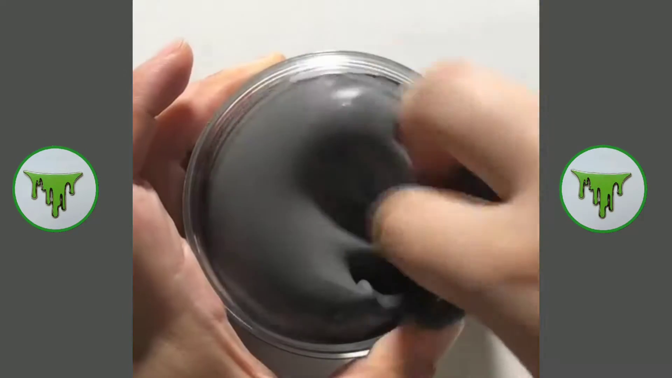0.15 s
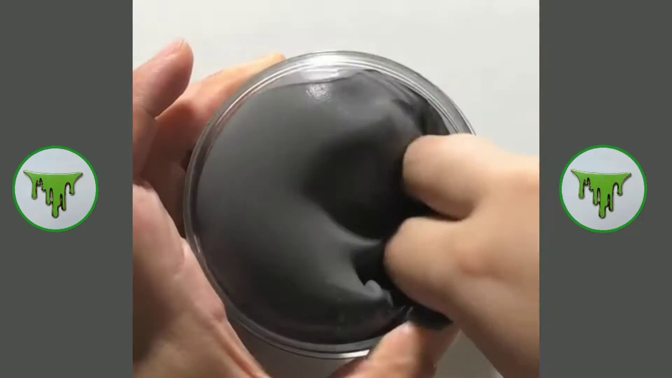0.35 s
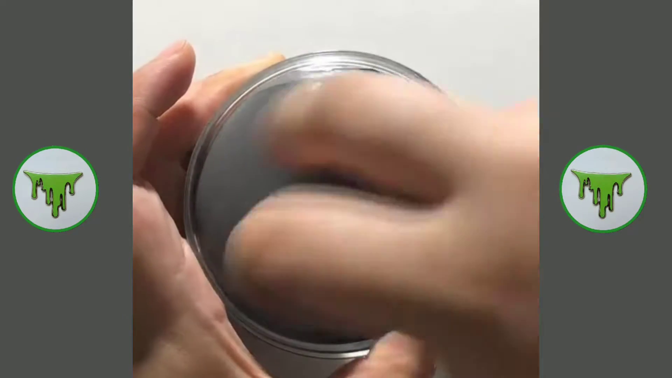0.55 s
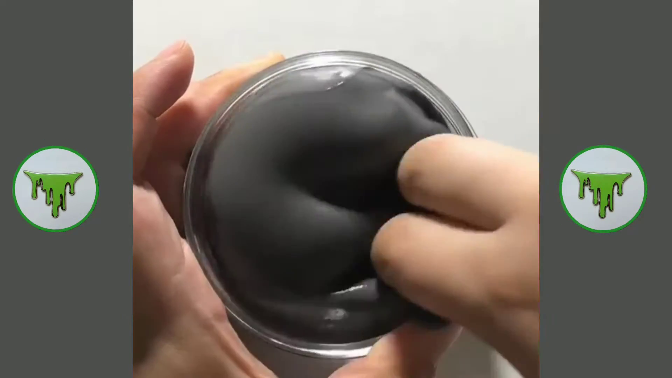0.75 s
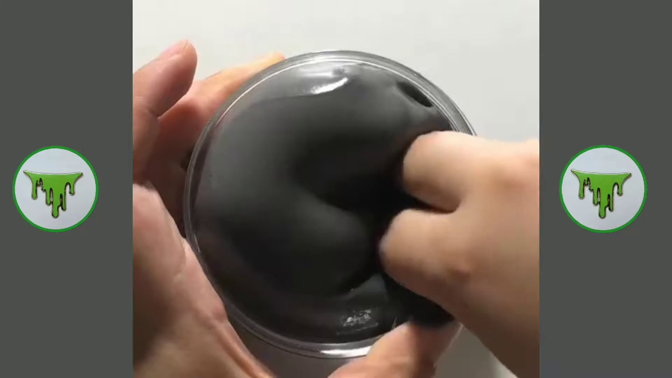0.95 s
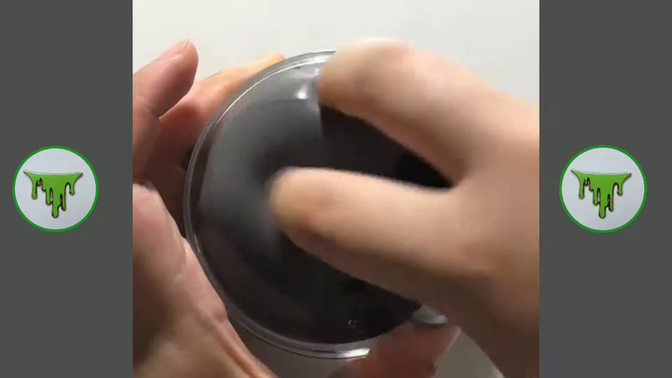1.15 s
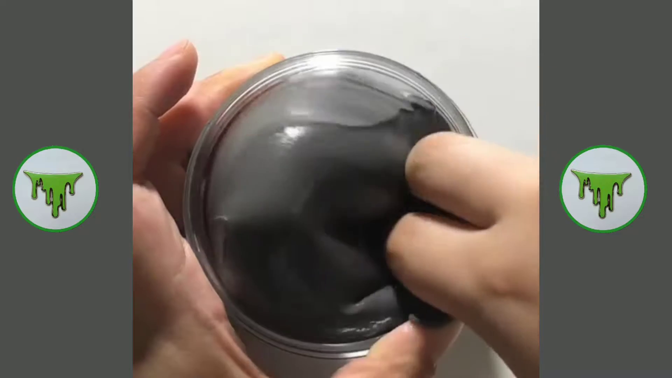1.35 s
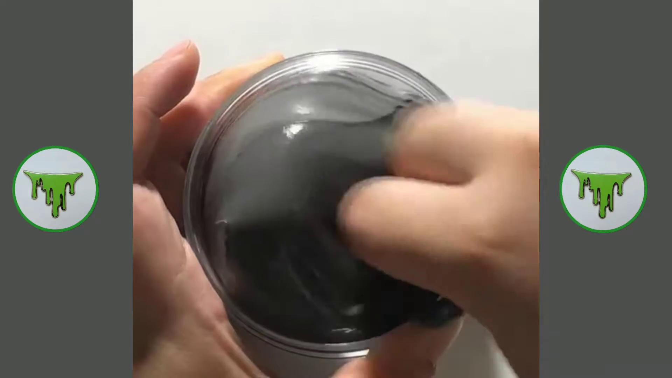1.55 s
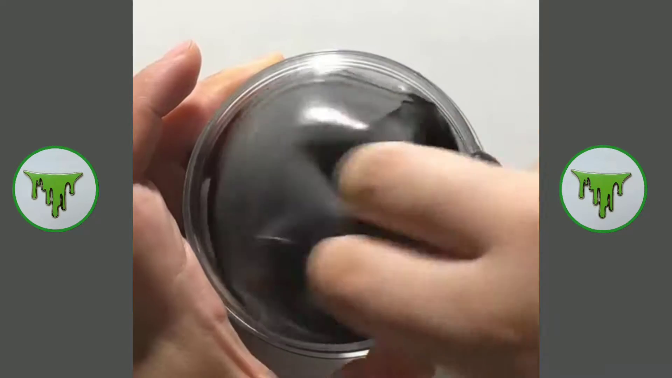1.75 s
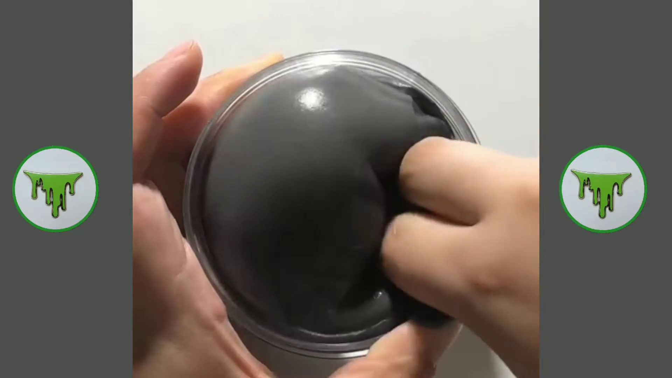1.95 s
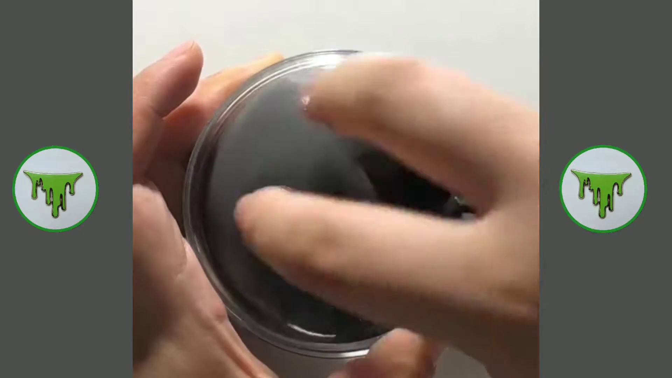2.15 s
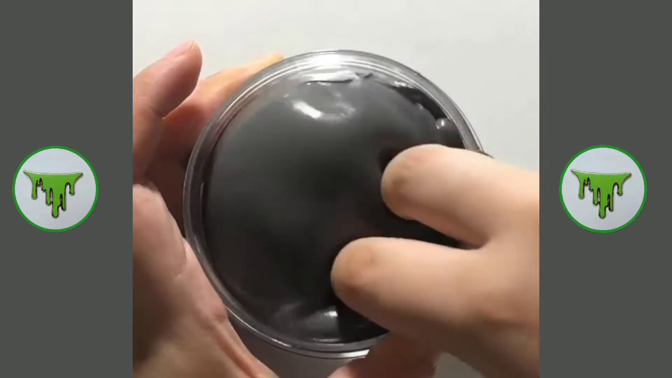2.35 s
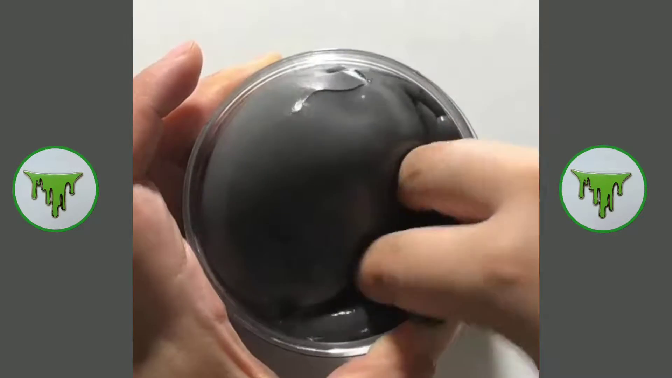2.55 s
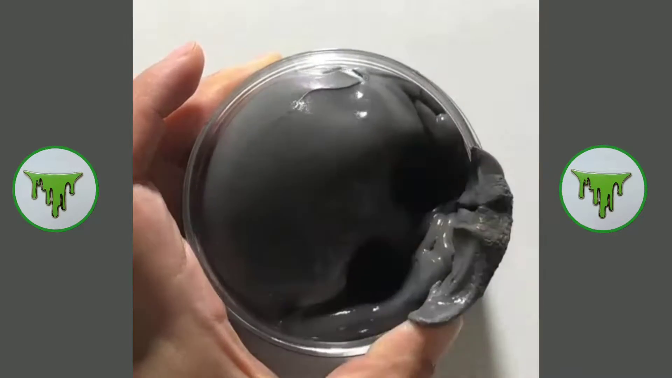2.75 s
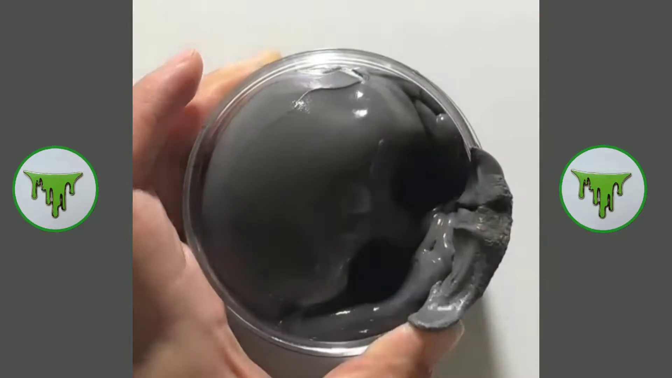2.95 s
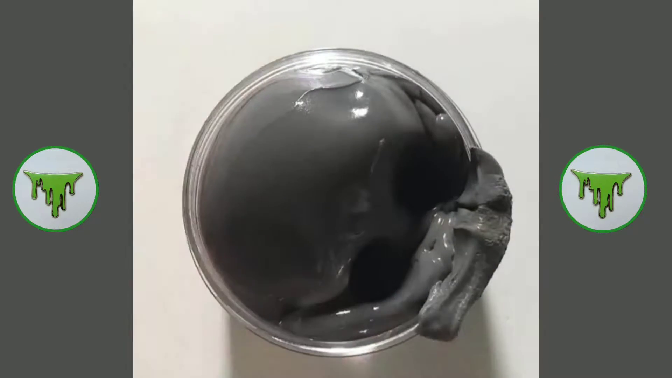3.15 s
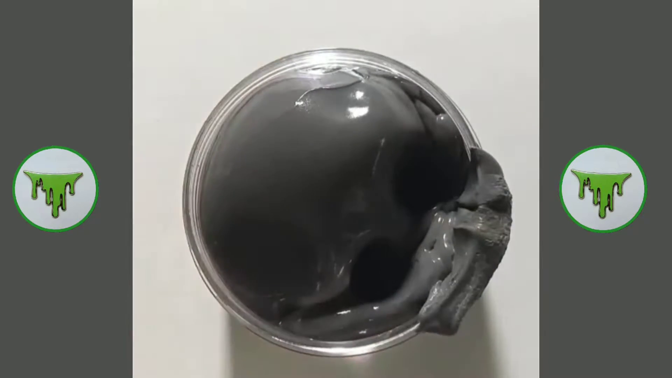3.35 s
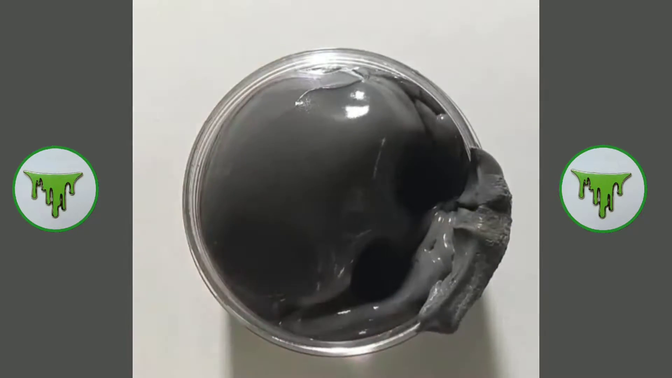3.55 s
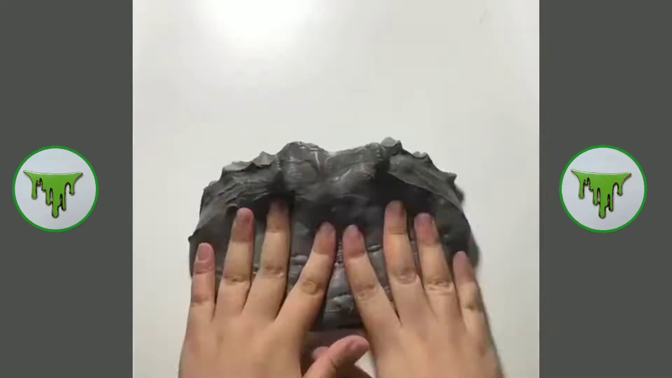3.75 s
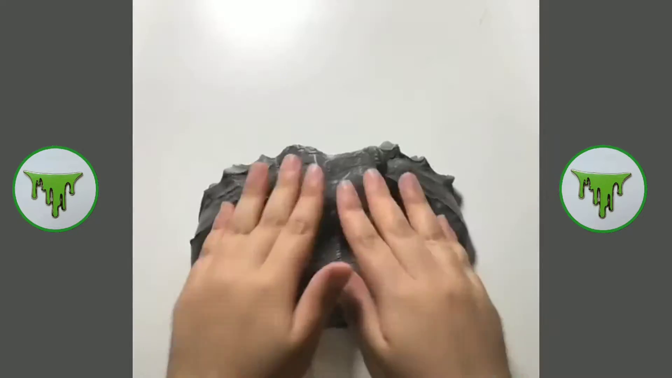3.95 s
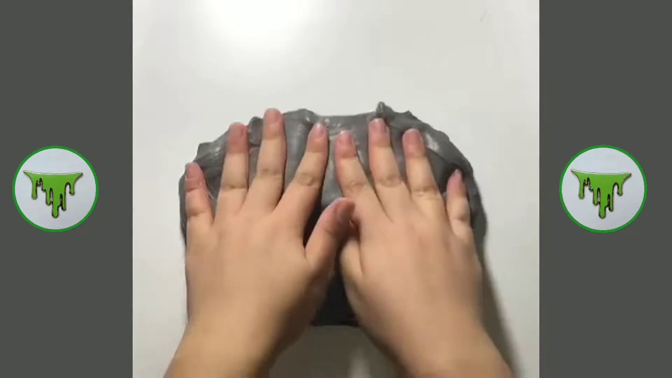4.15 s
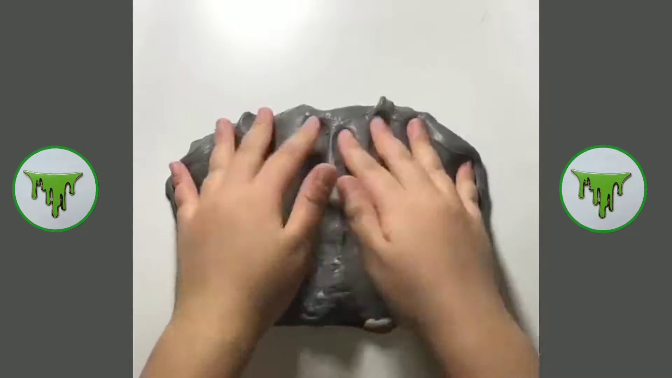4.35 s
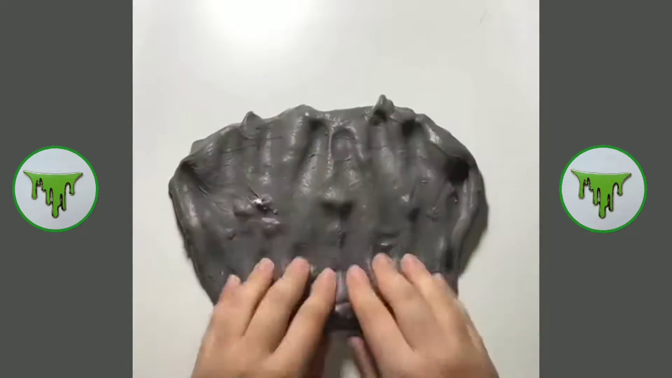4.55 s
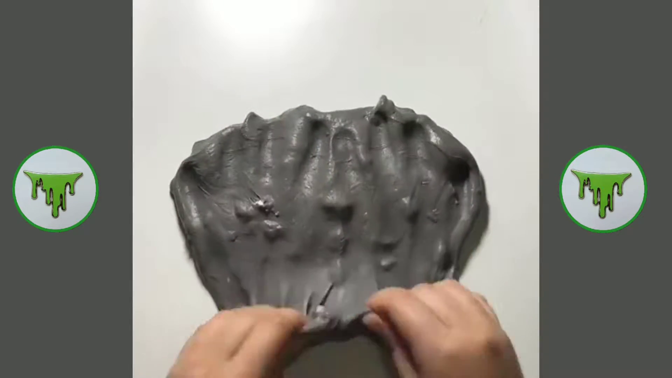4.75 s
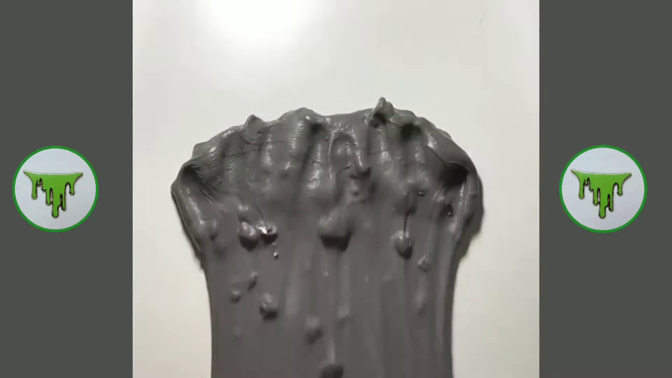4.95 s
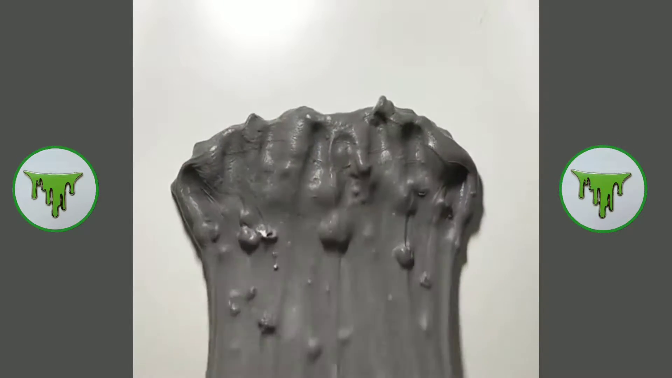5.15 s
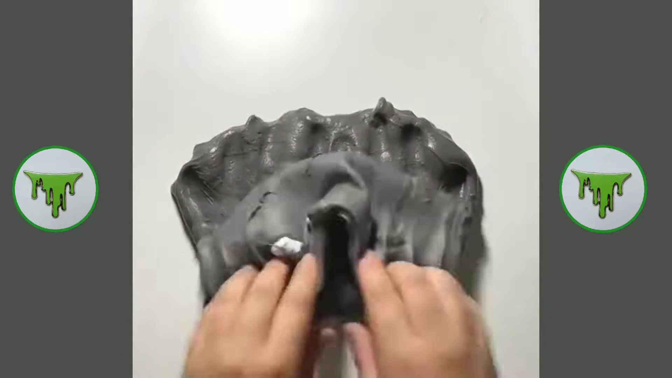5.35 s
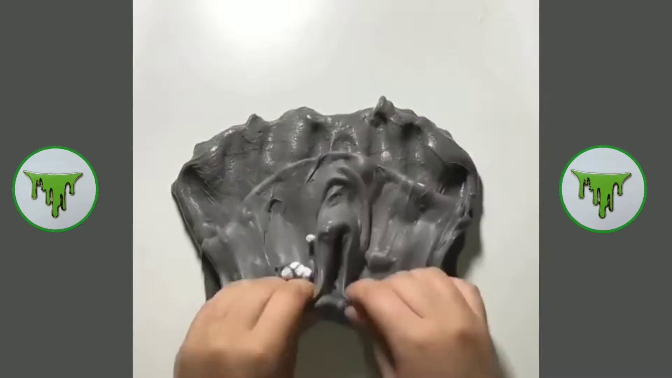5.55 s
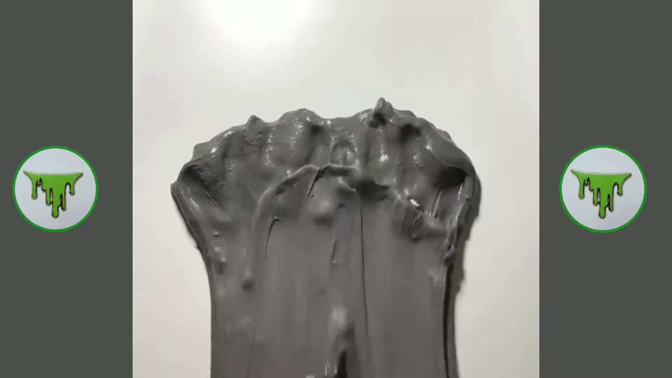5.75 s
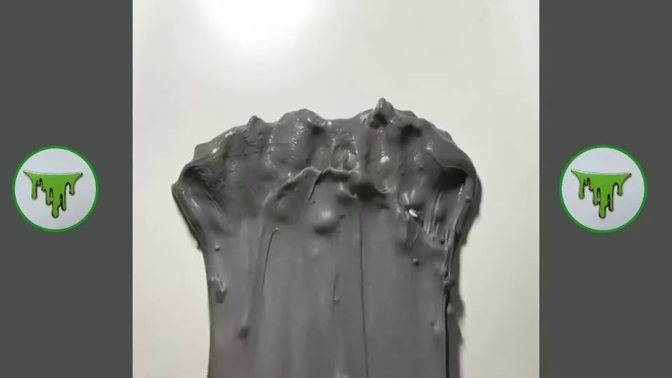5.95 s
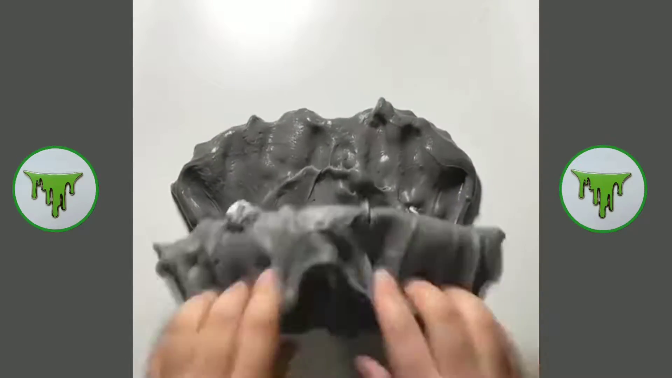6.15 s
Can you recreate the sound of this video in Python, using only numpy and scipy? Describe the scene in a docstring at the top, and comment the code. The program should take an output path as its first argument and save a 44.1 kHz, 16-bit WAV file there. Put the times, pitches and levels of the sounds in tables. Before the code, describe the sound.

Close, crisp slime sounds: snapping air bubbles and sticky crackles from a tub, a pause, then quieter squelchy pressing, peeling and folding on a table.

```python
"""A small, dry room: two fingers poke glossy slime in a plastic tub, then hands press, stretch and fold it on a table.
Trapped air bursts as damped rings with a soft modal thud; small bubbles tick as rings of a cycle or two.
Air spurts through narrow gaps and the sticky skin crackles as it peels: band-filtered swarms of tiny ruptures.
Landings add wet slaps; filtered noise makes the quiet ventilation hum and hiss underneath."""
import sys
import numpy as np
from scipy import signal
from scipy.fft import rfft, irfft, next_fast_len
from scipy.io import wavfile

SR = 44100
rng = np.random.default_rng(int(sys.argv[2]) if len(sys.argv) > 2 else 0)


def pcm_store(signal):
    """Save signal as 16-bit PCM."""
    levels = np.round(np.clip(np.atleast_2d(signal), -1, 1) * 32767)
    wavfile.write(sys.argv[1], SR, levels.astype(np.int16).T)


N = 277830
T = np.arange(N) / SR

# Air pockets bursting. Each row: time in seconds, pocket pitch in Hz, pocket level in dB,
# skin pitch in Hz, skin level in dB, snap level in dB, thud level in dB.
AIR_BURSTS = [(0.0972, 2570, -20, 4300, -25.5, -28.5, -42.5), (0.4633, 1840, -15, 4600, -17, -33, -39),
              (0.6253, 1540, -31, 2600, -35, -17.5, -43), (0.6498, 1690, -25.5, 4200, -12, -14.5, -44),
              (1.1725, 1590, -25, 3900, -19.5, -31, -36), (1.693, 1870, -30, 5800, -11.5, -20.5, -40),
              (2.2219, 1700, -61, 4400, -18, -15, -42.5), (2.4498, 2320, -36, 4500, -27, -35.5, -45),
              (2.5722, 2080, -34, 4500, -32, -37, -49.5), (2.7611, 2394, -27.5, 5600, -15.5, -8.5, -47.5),
              (2.7640, 1930, -21, 5000, -7, -7, -36.5), (5.544, 1260, -23, 3300, -24, -30, -40)]
# Tub, hands and slime landing softly. Each row: time in seconds, thud level in dB, wet slap level in dB.
LANDINGS = [(3.192, -44, -52), (4.182, -52, -53), (4.315, -47, -49), (4.754, -44.5, -69), (4.946, -48, -45),
            (5.386, -44.5, -49), (5.535, -52, -36.5), (5.555, -38, -38), (6.203, -45.5, -43)]
# Hands pressing, stretching and folding the sheet, which clings to the table in between.
# Each row: start in seconds, attack in seconds, hold in seconds, level in dB, brightness in dB per octave.
HAND_STROKES = [(3.919, 0.08, 0.036, -52.5, 3), (4.175, 0.012, 0.085, -62, 1),
                (4.317, 0.025, 0.097, -68, -1.5), (4.457, 0.053, 0.04, -52.5, 3.3),
                (4.672, 0.011, 0.5, -61.5, 2), (4.877, 0.017, 0.12, -50, 0), (5.202, 0.015, 1.042, -67, 1),
                (5.531, 0.028, .11, -61.5, -1.5), (5.657, 0.035, 0.12, -51, -1),
                (5.818, 0.016, 0.076, -59.5, -0.5)]


def pops(snap_hz=9200, strain_db=-35, strain_t60_s=0.06, splatter_db=-30, splatter_t60_s=0.069):
    """The skin fizzes as it thins, then tears: its air rings low, the skin high, the tear snaps, wet shreds settle."""
    out = np.zeros(N)
    t = T[:SR // 4]
    lead_s = 0.04
    for s, pocket_hz, pocket_db, skin_hz, skin_db, snap_db, _ in AIR_BURSTS:
        pocket = undb(pocket_db) * ring(pocket_hz, cycles=0.4)
        skin = undb(skin_db) * ring(skin_hz, cycles=0.93)
        snap = undb(snap_db) * ring(snap_hz, cycles=0.79)
        add(out, s, hollow(pocket - skin + snap))
        force = np.sqrt(np.sum(undb([pocket_db, skin_db, snap_db]) ** 2))
        strain = band(ruptures(len(t), per_s=6000, spread_db=4), 6000, 3) * fade(t, strain_t60_s)
        # reversed decay: the fizz grows towards the tear
        growing = strain[int(lead_s * SR)::-1]
        add(out, s - lead_s, force * undb(strain_db) * growing)
        splatter = band(ruptures(len(t), per_s=5000, spread_db=3), 3500, 5) * fade(t, splatter_t60_s)
        add(out, s, force * undb(splatter_db) * splatter)
    return out


def crackle():
    """Sticky skin peels off fingers, then hands and table, ringing in the hollows that each stroke opens."""
    # Fingers pulling out of the slime in the tub. Each row: start in seconds, attack in seconds,
    # hold in seconds, level in dB, brightness in dB per octave.
    finger_pulls = [(0, 0.0017, 0.0069, -59.5, -19), (0.259, 0.032, 0.13, -62, 0.5),
                    (0.387, .015, 0.036, -60.5, 2.5), (0.858, 0.026, 0.05, -64.5, 0.5),
                    (.955, 0.016, 0.042, -65.5, 5), (1.35, 0.018, 0.18, -67, 2.5),
                    (1.894, 0.023, .02, -62, 4), (1.952, 0.0091, 0.15, -67, -1),
                    (2.387, 0.023, 0.057, -67, 4.5), (2.494, 0.015, 0.077, -60, -19),
                    (2.59, .01, 0.036, -70, 7)]
    # Bubble sizes in the peeling skin, dense crackle first, then lone blisters.
    # Each row: centre in Hz, width in octaves, ruptures per second, relative level in dB.
    tub_voices = [(2960, 3.1, 500, 0), (8000, .83, 670, -4), (4000, 1.6, 25, -7)]
    # The same for the sheet on the table. Each row: centre in Hz, width in octaves,
    # ruptures per second, relative level in dB.
    sheet_voices = [(620, 1.3, 500, -9), (1280, 1.2, 500, -1.5), (3200, 1.4, 900, .5),
                    (7600, 1.25, 2200, -.5), (1330, .45, 30, -6)]
    out = np.zeros(N)
    for pull in finger_pulls:
        sound = peel(pull, tub_voices, jerk_db=3.5)
        add(out, pull[0], undb(-3.5) * shifting_hollow(sound, hollow_db=-2.5))
    for stroke in HAND_STROKES:
        sound = peel(stroke, sheet_voices, jerk_db=4.0)
        add(out, stroke[0], undb(-5.5) * shifting_hollow(sound, hollow_db=-2.0))
    return out


def peel(stroke, voices, jerk_db, jerks_per_s=110, release_t60_s=0.17, mid_hz=3000):
    """A stroke builds, holds and lets go; skin gives way in jerks, each pitch on its own; brightness tilts the bands."""
    _, attack_s, hold_s, level_db, brightness = stroke
    # whole tenths of a second
    t = T[:int(np.ceil((attack_s + hold_s + release_t60_s) * 10)) * SR // 10]
    release = fade(np.maximum(t - attack_s - hold_s, 0), release_t60_s)
    effort = np.clip(t / attack_s, 0, 1) ** 2 * release
    sound = 0
    for hz, octaves, per_s, db in voices:
        # three sub-bands across each voice
        for offset in np.linspace(-1, 1, 3) * octaves / 3:
            jerk_gains = undb(jerk_db * rng.standard_normal(400))
            jerks = np.interp(t * jerks_per_s, np.arange(400), jerk_gains)
            grains = band(ruptures(len(t), per_s, spread_db=3), hz * 2 ** offset, octaves / 2)
            tilt_db = brightness * np.log2(hz / mid_hz)
            sound = sound + undb(db + tilt_db) * jerks * grains / np.sqrt(3)
    return undb(level_db) * effort * sound


def ticks(edge_db=-16, edge_s=0.000876):
    """Bubbles ring for a cycle or two, with a brief wet edge of noise."""
    # The bubbles that stand out, from tiny ticks to deep gulps under the fold.
    # Each row: time in seconds, level in dB, pitch in Hz.
    bubbles = [(0.1202, -29.5, 2300), (.283, -41.5, 4200), (.4581, -28.5, 4300), (.47, -26.5, 4600),
               (.9301, -39.5, 4670), (0.9622, -31.5, 7400), (.974, -30.5, 5560), (0.9801, -25.5, 5530),
               (1.164, -18, 7050), (1.179, -22, 4400), (1.494, -38.5, 4970), (1.6927, -41, 3260),
               (1.9635, -37, 6100), (2.037, -46, 3730), (2.128, -50, 4260), (2.1925, -42.5, 1760),
               (2.216, -28, 6500), (2.4023, -36, 1920), (2.417, -37.5, 6540), (2.7811, -25.5, 3800),
               (3.164, -45, 4360), (3.303, -41.5, 7660), (4.424, -45.5, 6100), (4.496, -33, 7900),
               (4.182, -41.5, 990), (4.237, -28.5, 7540), (4.3159, -39, 1070), (4.8445, -34.5, 4600),
               (4.8935, -37, 1290), (4.898, -34.5, 1340), (4.9531, -32.5, 1150), (5.0922, -37, 2700),
               (5.1753, -40.5, 3300), (5.2082, -34.5, 3510), (5.56, -35, 140), (5.588, -36, 294),
               (5.5935, -30, 197), (5.6246, -36.5, 1210), (5.674, -39, 1190), (5.741, -36, 1360),
               (5.763, -36, 1330), (5.8209, -29, 1500), (5.9194, -35.5, 3300)]
    out = np.zeros(N)
    t = T[:SR // 50]
    for s, db, hz in bubbles:
        edge = band(rng.standard_normal(len(t)), hz, 3) * t / edge_s * np.exp(1 - t / edge_s)
        add(out, s - 0.0007, undb(db + edge_db) * edge)
        add(out, s, undb(db) * hollow(ring(hz, cycles=0.61)))
    return out


def spurts():
    """Air forced through a closing gap: a quick swarm of ruptures swells and dies, coloured by the gap."""
    # Each row: middle in seconds, length in seconds (at half height), level in dB,
    # centre in Hz, width in octaves.
    gaps = [(0.106, 0.015, -36, 3330, 1.5), (.331, .03, -61.5, 1970, 0.092),
            (.431, 0.017, -48.5, 8040, .32), (.466, 0.0068, -29.5, 9140, 0.37),
            (.641, 0.031, -42, 3020, 1.2), (1.008, 0.022, -53.5, 4000, 0.54),
            (1.159, 0.013, -49, 6000, 5.3), (1.176, 0.0098, -30.5, 5800, 3.4),
            (1.712, 0.0087, -37, 4050, 1.9), (2.215, 0.019, -45, 5540, 9.9), (2.396, 0.031, -59, 1950, 1.1),
            (2.512, 0.02, -33, 11300, 1.05), (4.015, 0.049, -57, 630, 1.2), (5.331, 0.025, -56, 3322, 0.74),
            (5.82, 0.0037, -37.5, 4930, 2.9), (5.973, .07, -55, 3400, 0.86)]
    out = np.zeros(N)
    for s, length_s, db, hz, octaves in gaps:
        swarm = band(ruptures(SR // 4, per_s=4000, spread_db=3), hz, octaves)
        swell = np.hanning(min(int(2 * length_s * SR), len(swarm)))
        air = unit(hollow(swarm, hollow_db=3.5))[:len(swell)]
        add(out, s - length_s, undb(db) * swell * air)
    return out


def slaps(slap_hz=1200, slap_octaves=1.74, spray_hz=3500, spray_db=-4, rise_s=0.0019, t60_s=0.093):
    """A landing squeezes out a wet squelch and a finer spray, which die away at once."""
    out = np.zeros(N)
    t = T[:SR // 4]
    shape = np.clip(t / rise_s, 0, 1) * fade(t, t60_s)
    for s, _, db in LANDINGS:
        squelch = band(ruptures(len(t), per_s=2500, spread_db=2), slap_hz, slap_octaves)
        spray = band(ruptures(len(t), per_s=5000, spread_db=2), spray_hz, 3)
        add(out, s, undb(db) * shape * (squelch + undb(spray_db) * spray))
    return out


def thuds(palm_hz=480, palm_low_hz=170, lean_db=6):
    """Every pop lets the slime slump; hands and folds land softly and lean in mid-stroke, with a rounder thud."""
    slumps, pats = np.zeros(N), np.zeros(N)
    for s, *_, db in AIR_BURSTS:
        add(slumps, s, undb(db) * thud())
    for s, db, _ in LANDINGS:
        add(pats, s, undb(db) * thud())
    for s, attack_s, hold_s, db, _ in HAND_STROKES:
        add(pats, s + attack_s + hold_s / 3, undb(db + lean_db) * thud())
    return slumps + colour(pats, lambda f: -10 * np.log10(1 + (f / palm_hz) ** 4 + (palm_low_hz / f) ** 4))


def thud(detune=0.065, dull_t60_s=0.26):
    """The soft mass jolts the table: low modes, struck a little differently each time, and a faint dull rumble."""
    # What rings, table and room. Each row: frequency in Hz, relative level in dB, t60 in seconds.
    table_modes = [(100.6, -6, 0.18), (173.5, 2, 0.16), (232, -4.5, 0.11), (297.5, -5, .13),
                   (387.2, -6, 0.14), (439, -9, .1), (608, -9, 0.099)]
    t = T[:SR // 3]
    chance = rng.standard_normal((len(table_modes), 2))
    modes = 0
    for k, ((hz, db, t60_s), (pitch_dev, level_dev_db)) in enumerate(zip(table_modes, chance)):
        tone = np.sin(2 * np.pi * hz * (1 + detune * pitch_dev) * t)
        modes = modes + undb(db + level_dev_db) * fade(t, t60_s) * tone * (-1) ** k
    rumble = undb(-10) * band(rng.standard_normal(len(t)), 260, 2.1) * fade(t, dull_t60_s)
    return (modes + rumble) * (1 - np.exp(-t / 0.002))


def room_tone(air_db=-58.5):
    """A low ventilation rumble with wavering hum bands, under faint hiss: all filtered noise."""
    # Each row: frequency in Hz, relative noise density in dB.
    air_spectrum = [(15, -53.5), (25, -31), (48, -17), (145, -9), (169, -9.5), (192, -18), (298, -18.5),
                    (418, -22), (513, -25), (631, -28), (817, -29.5), (1200, -34.5), (1300, -36),
                    (2680, -41.5), (12000, -48), (15600, -80.5), (22000, -120)]
    # Ventilation hum. Each row: centre in Hz, width in Hz, level in dB.
    hum_bands = [(58, 11, -67.5), (77, 7, -64), (120, 17, -62.5), (147.7, 20, -68.5), (229, 31, -68.5)]
    hz, db = np.transpose(air_spectrum)
    air = unit(colour(rng.standard_normal(N), lambda f: np.interp(np.log(f), np.log(hz), db)))
    hum = 0
    for f, width_hz, hum_db in hum_bands:
        hum = hum + undb(hum_db) * band(rng.standard_normal(N), f, width_hz / f / np.log(2))
    return undb(air_db) * air + hum


def hollow(x, hollow_db=-7, hollow_t60_s=0.016):
    """The hollow between fingers and slime has a new shape each time, so each burst gets its own short resonances."""
    t = T[:SR // 50]
    echoes = unit(rng.standard_normal(len(t)) * fade(t, hollow_t60_s) * (t > 0.0004)) / np.sqrt(len(t))
    return x + undb(hollow_db) * signal.fftconvolve(x, echoes)[:len(x)]


def shifting_hollow(x, hollow_db, shape_s=0.025):
    """Moving slime gives the hollow a new shape every shape_s seconds, so its resonances keep changing."""
    hop = int(shape_s * SR)
    out = np.zeros(N)
    for start in range(-hop, len(x), hop):
        first = max(start, 0)
        part = x[first:start + 3 * hop]
        # triangular crossfade
        blend = np.interp(first + np.arange(len(part)), [start, start + hop, start + 2 * hop], [0, 1, 0])
        add(out, first / SR, hollow(part * blend, hollow_db=hollow_db))
    return out[:len(x)]


def off_table(x):
    """The bounce off the table top and the tub's hollow lift the low mids and slightly cut the treble."""
    # Each row: frequency in Hz, gain in dB.
    bounce_gains = [(300, 1), (560, 2.5), (880, 1.5), (1200, 1), (1650, 0.5), (2400, -0.5), (4500, -1)]
    hz, db = np.transpose(bounce_gains)
    return colour(x, lambda f: np.interp(np.log(f), np.log(hz), db))


def room(x, wall_db=-16, wall_t60_s=0.14):
    """The walls add a faint short tail: convolution with decaying noise."""
    t = T[:SR // 3]
    walls = unit(rng.standard_normal(len(t)) * fade(t, wall_t60_s) * np.clip(t / 0.016, 0, 1)) / np.sqrt(len(t))
    return x + undb(wall_db) * signal.fftconvolve(x, walls)[:N]


def ruptures(size, per_s, spread_db):
    """Tiny sticky threads let go at random moments, most weak, a few strong, pushing or pulling."""
    out = np.zeros(size)
    chance = rng.random(size) * SR / per_s
    at = np.flatnonzero(chance < 1)
    strength_db = spread_db * np.minimum(-np.log(chance[at]), 4)
    out[at] = undb(strength_db) * (-1.) ** at
    return out


def ring(hz, cycles):
    """A damped oscillation whose envelope peaks after the given number of cycles."""
    turns = hz * T[:SR // 20]
    age = turns / cycles
    return age * np.exp(1 - age) * np.sin(2 * np.pi * turns)


def fade(t, t60_s):
    """Exponential decay, 60 dB in t60_s seconds."""
    return np.exp(-np.log(1000) * t / t60_s)


def band(x, hz, octaves):
    """A bell-shaped band, half power at its edges, rms 1."""
    return unit(colour(x, lambda f: -12 * (np.log2(f / hz) / octaves) ** 2))


def colour(x, db_at):
    """Filter by a gain in dB given as a function of frequency."""
    size = next_fast_len(len(x))
    hz = np.maximum(np.fft.rfftfreq(size, 1 / SR), 1)
    return irfft(rfft(x, size) * undb(db_at(hz)), size)[:len(x)]


def add(track, s, sound):
    """Mix a sound into the track at s seconds."""
    start = max(int(round(s * SR)), 0)
    part = sound[:max(N - start, 0)]
    track[start:start + len(part)] += part


def unit(x):
    """Scale to rms 1."""
    return x / np.sqrt(np.mean(x ** 2) + 1e-20)


def undb(db):
    """Decibels to gain."""
    return 10 ** (np.asarray(db) / 20)


def scene():
    """A faint random side signal slightly widens the treble; the rest is centred."""
    wet = room(pops() + ticks() + spurts() + slaps() + crackle())
    mid = off_table(wet + thuds()) + room_tone()
    treble = colour(mid, lambda f: -10 * np.log10(1 + (3700 / f) ** 16))
    kernel = rng.standard_normal(128)
    # odd symmetry shifts the phase between the channels, not the level
    kernel = np.concatenate([-kernel[::-1], [0], kernel])
    side = undb(-20.5) * signal.fftconvolve(treble, kernel / np.linalg.norm(kernel), mode="same")
    return np.array([mid + side, mid - side])


def record(dry, low_hz=38, top_hz=11750):
    """Cut the deepest bass and everything above top_hz."""
    dry = signal.sosfilt(signal.butter(3, low_hz, "high", fs=SR, output="sos"), dry)
    return signal.sosfilt(signal.ellip(8, 0.3, 60, top_hz, fs=SR, output="sos"), dry)


dry = scene()
out = record(dry)
pcm_store(out)
```